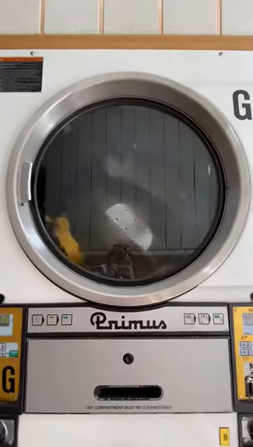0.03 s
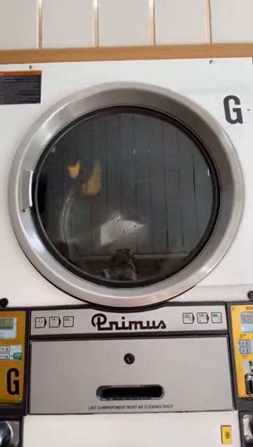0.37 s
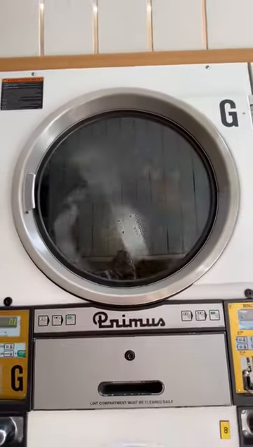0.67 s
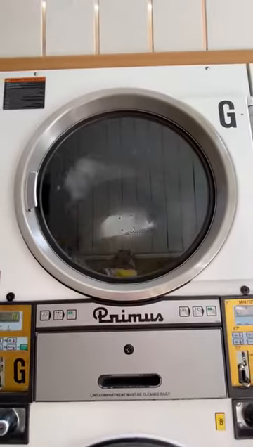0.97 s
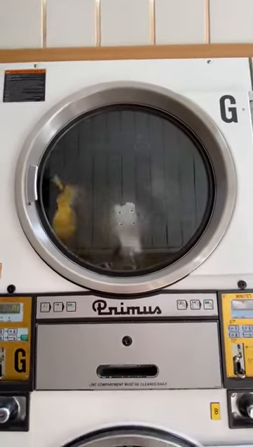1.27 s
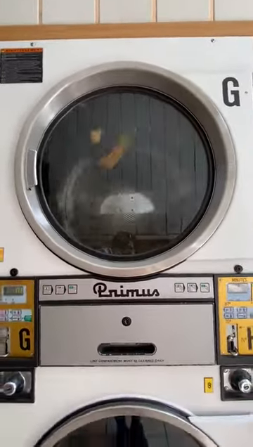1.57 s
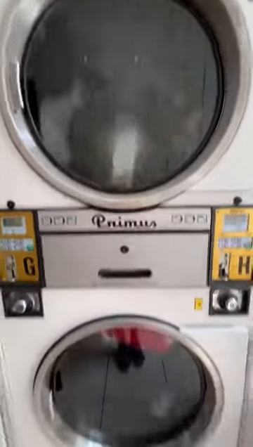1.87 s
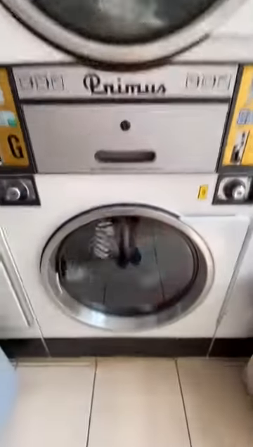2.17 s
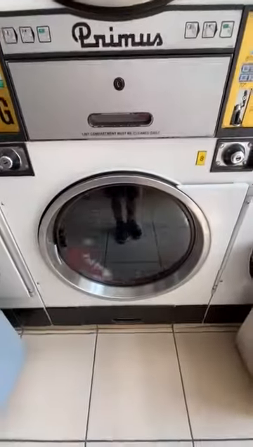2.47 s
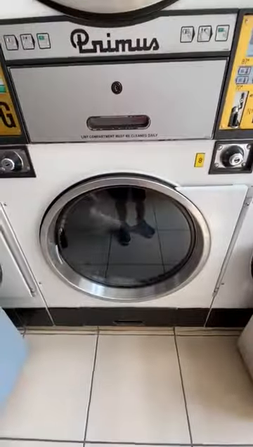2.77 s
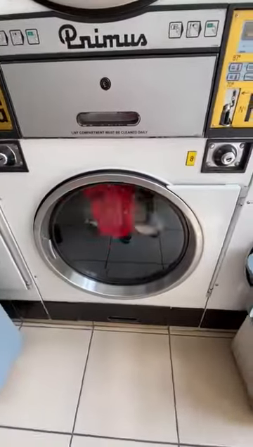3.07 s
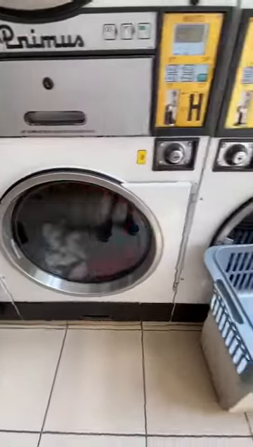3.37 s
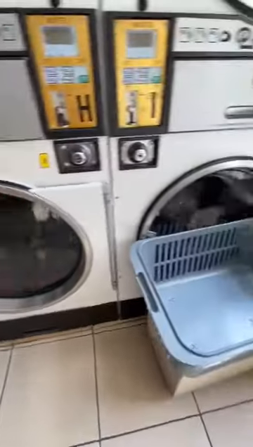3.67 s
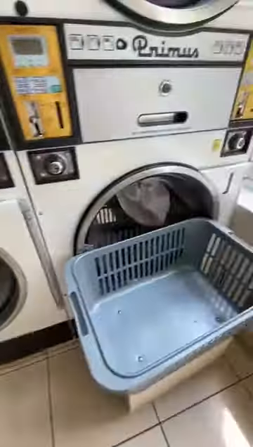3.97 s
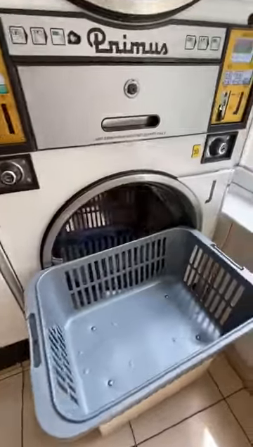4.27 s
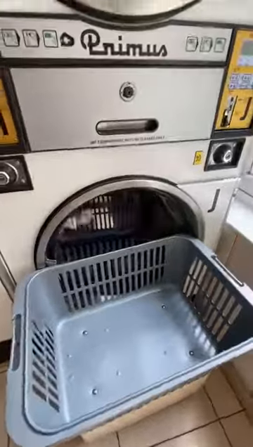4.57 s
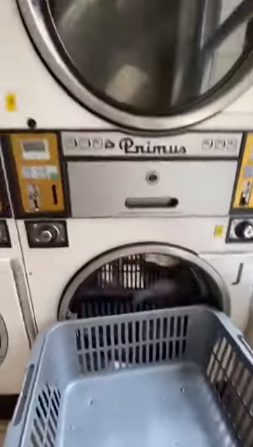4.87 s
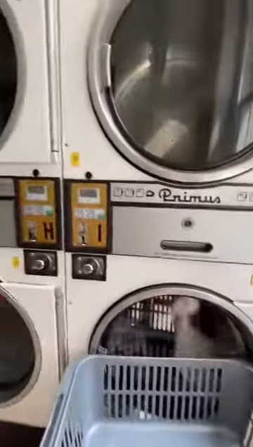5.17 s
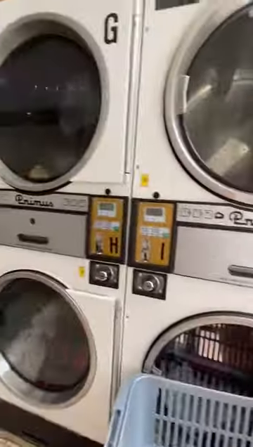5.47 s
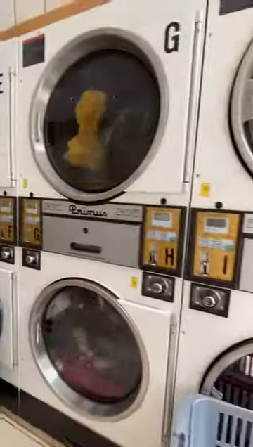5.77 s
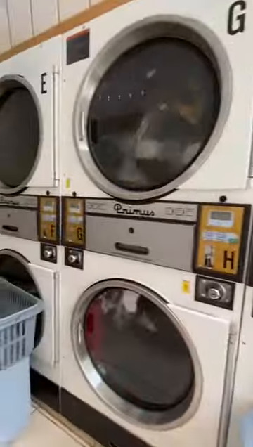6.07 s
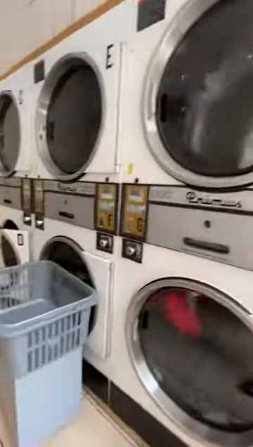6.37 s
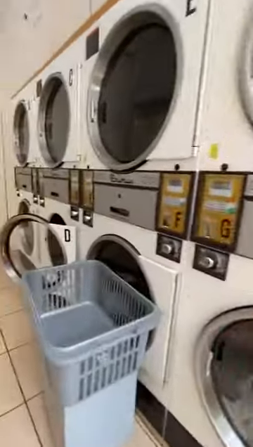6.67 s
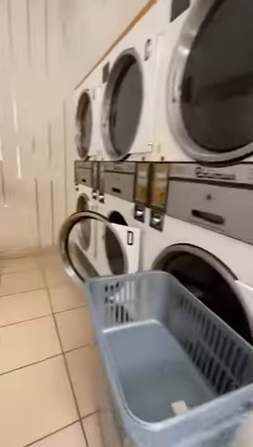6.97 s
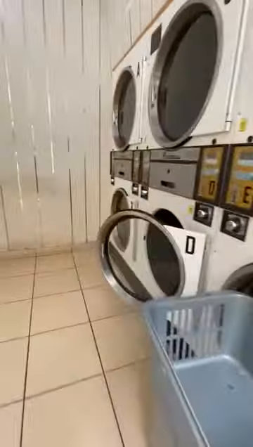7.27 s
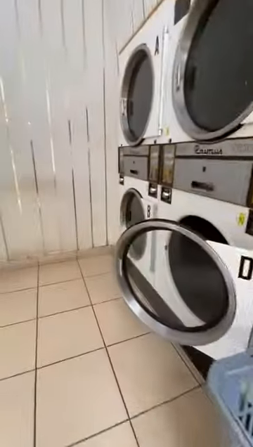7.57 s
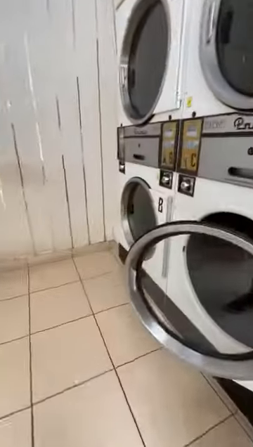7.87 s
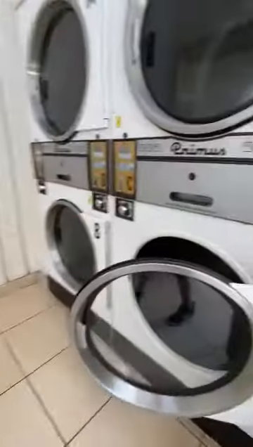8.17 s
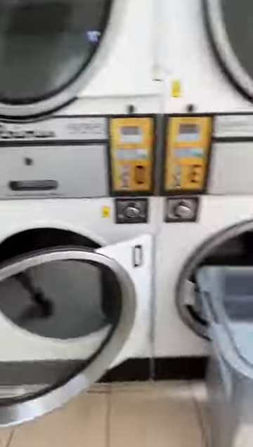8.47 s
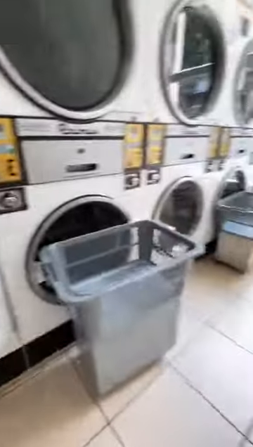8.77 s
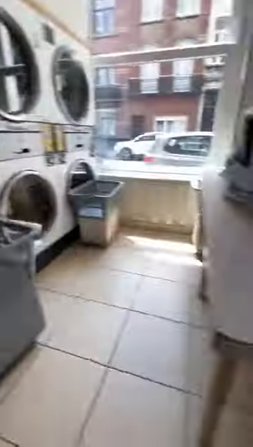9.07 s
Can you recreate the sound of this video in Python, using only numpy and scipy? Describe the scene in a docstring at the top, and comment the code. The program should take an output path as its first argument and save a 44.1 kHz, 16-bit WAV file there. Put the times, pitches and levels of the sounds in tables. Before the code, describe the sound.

Several tumble dryers run in a tiled laundrette, making a deep, throbbing hum over drum rumble and rushing air. A little more than once a second a zip clacks on a steel drum and damp washing knocks softly after it. Buttons tick and cloth swishes in between, with a faint whistle. The hum shifts as the microphone is carried along the machines, and the clicks thin out near the end.

```python
"""Laundrette tumble dryers

A phone is carried along a row of dryers in a tiled room, then away. Mains hum throbs against a slipping
motor, blowers push air through ducts and a whistling grille, drums rumble, a loose part buzzes faintly.
Once a drum turn a zip clacks on the steel and the wet bundle knocks after it; in between, buttons tick,
seams scrape and cloth rustles."""
import sys
import numpy as np
from scipy import signal
from scipy.fft import rfft, irfft, next_fast_len
from scipy.io import wavfile

SR = 44100
rng = np.random.default_rng(int(sys.argv[2]) if len(sys.argv) > 2 else 0)


def wav_record(signal):
    """Record a signal, one row per channel, as 16-bit PCM in the file named by sys.argv[1]."""
    frames = np.transpose(np.atleast_2d(signal))
    bounded = np.clip(frames, -1, 1)
    # unit amplitude maps onto the largest positive 16-bit level
    quanta = np.round(bounded * 32767).astype(np.int16)
    wavfile.write(sys.argv[1], SR, quanta)


N = 402191
TIME = np.arange(N) / SR
SIZE = next_fast_len(N, True)
FREQS = np.maximum(np.fft.rfftfreq(SIZE, 1 / SR), 1)


def undb(db):
    """Decibels to gain."""
    return 10 ** (np.asarray(db) / 20)


def unit(x):
    """Scale to rms 1."""
    return x / np.sqrt(np.mean(x ** 2))


def curves(table):
    """The columns of a time table as automation curves, one value a sample."""
    s, *columns = np.transpose(table)
    return [np.interp(TIME, s, c) for c in columns]


def across(points):
    """A (frequency, value) table spread over all frequencies."""
    hz, value = np.transpose(points)
    return np.interp(np.log(FREQS), np.log(np.sort(hz)), value)


def colour(x, eq):
    """Apply an EQ curve, scaled so that white noise keeps its power."""
    return irfft(rfft(x, SIZE) * unit(undb(across(eq))), SIZE)[..., :N]


def noise():
    """Two white noises: what both microphone ports share, and what reaches them diffusely."""
    return rng.standard_normal((2, N))


def drift(rate_hz):
    """Smooth random modulation with rms 1."""
    coarse = rng.standard_normal(8192)
    hz = np.arange(len(coarse) // 2 + 1) / TIME[-1]
    smooth = irfft(rfft(coarse) / (1 + (hz / rate_hz) ** 4))
    return unit(np.interp(TIME, np.linspace(0, TIME[-1], len(coarse)), smooth))


def swell(middle_s, half_s, steepness=2):
    """A bell-shaped fade in and out."""
    return np.exp(-((TIME - middle_s) / half_s) ** steepness)


def flutter(phase, rate_hz):
    """A carrier that wanders in level and phase: a narrow band of noise."""
    return drift(rate_hz) * np.sin(phase) + drift(rate_hz) * np.cos(phase)


def tone(hz, unsteady, flutter_hz):
    """A sine of which the unsteady share flutters."""
    phase = 2 * np.pi * (hz * TIME + rng.random())
    return unit((1 - unsteady) * np.sin(phase) + unsteady * flutter(phase, flutter_hz) / 2)


def grains(triggers, decay_s):
    """Each trigger fires a decaying grain of noise."""
    power = signal.lfilter([1], [1, -np.exp(-1 / (decay_s * SR))], triggers + 1e-18)
    return unit(noise() * np.sqrt(power))


# EQ of the room tone: (frequency [Hz], relative level [dB])
ROOM_EQ = [(4000, -8), (7400, -4), (8400, -2), (9300, 3), (11500, 0)]


def room_tone(level_db=-66):
    """The thin, even hiss of the room."""
    return colour(noise(), ROOM_EQ) * undb(level_db)


# faders along the walk: (time [s], drum rumble [dB], roar bass [dB], roar treble [dB], air hiss [dB])
BED_FADERS = [(0.1, -44.5, -33.5, -48.5, -52), (0.17, -36.5, -35.5, -49, -55),
              (3.72, -35, -32, -49.5, -51.5), (3.82, -38, -33, -50, -50.5), (4.5, -31.5, -34, -50, -51),
              (6.53, -38, -34, -49, -52), (7.05, -32.5, -36.5, -49.5, -54), (7.42, -37.5, -34.5, -53, -54),
              (7.69, -34.5, -37, -54.5, -55.5), (8.83, -38.5, -37, -54.5, -55.5),
              (8.95, -47.5, -37, -53, -53.5)]
# EQs of drum rumble, duct roar and air hissing through the drum holes: (frequency [Hz], rel. level [dB])
RUMBLE_EQ = [(15, -23), (28, -13), (42, -5.5), (55, -4.5), (65, -0.5), (85, -4.5), (120, -13), (180, -31.5),
             (400, -66.5)]
ROAR_EQ = [(60, -17.5), (130, 1), (190, 1), (245, -1.5), (290, 0.5), (320, -1.5), (410, -3.5), (460, -11),
           (560, -11.5), (630, -11.5), (720, -14.5), (1000, -18.5), (1300, -30.5), (3000, -48.5)]
HISS_EQ = [(500, -12.5), (1200, 3), (1550, 3), (1850, -0.5), (2500, 3.5), (3100, 3.5), (3800, -3.5),
           (4500, -5.5), (5600, -3), (6600, -1.5), (7600, -27), (8600, -13.5), (12000, -25.5)]


def dryer_bed(crossover_hz=580, surge_db=1.24, flicker_db=1.7):
    """Drums rumble, blowers roar and hiss; the machines' fronts shade the roar's treble sooner."""
    rumble_db, bass_db, treble_db, hiss_db = curves(BED_FADERS)
    out = colour(noise(), RUMBLE_EQ) * undb(rumble_db + 1)
    roar = colour(noise(), ROAR_EQ)
    bass = irfft(rfft(roar, SIZE) / (1 + (FREQS / crossover_hz) ** 6), SIZE)[:, :N]
    out += bass * undb(bass_db + 1 + surge_db * drift(8.5))
    out += (roar - bass) * undb(treble_db + 18 + surge_db * drift(7.4))
    return out + colour(noise(), HISS_EQ) * undb(hiss_db + 3 + flicker_db * drift(19))


# hum along the walk through the room's standing waves: (time [s], hum [dB], motor relative to hum [dB])
HUM_FADERS = [(0.0, -20.0, -13), (2.7, -23, -15), (3.0, -23.5, 0), (3.3, -22.5, -17), (3.7, -19, -15.5),
              (4.0, -24, -6), (4.3, -19, -6), (4.9, -19.5, -25), (5.2, -19.5, -10), (5.5, -23.5, -1),
              (5.9, -19, -13.5), (6.8, -28, -3), (7.1, -25, -19.5), (7.6, -28, -4.5), (7.9, -34.5, -11.9),
              (8.15, -47, -6), (8.3, -37, -12), (8.8, -29, -27), (9.12, -30, -9.5)]


def hum(hum_hz=100, slip_hz=1.615, in_step_s=0.338, unsteady=0.079):
    """The mains hum and a motor slipping just under it drift in and out of step, so the sum throbs."""
    hum_db, motor_db = curves(HUM_FADERS)
    phase = 2 * np.pi * hum_hz * TIME
    slip = 2 * np.pi * slip_hz * (TIME - in_step_s)
    motor = undb(motor_db) * np.sin(phase - slip)
    return np.sqrt(2) * undb(hum_db) * (np.sin(phase) + motor + unsteady * flutter(phase, 10))


# faders of the blower's shaft and of its strongest blade tone: (time [s], level [dB])
SHAFT_FADER = [(0.05, -45), (.35, -33), (.6, -46), (2.3, -38), (3.5, -39), (4.7, -35.5), (5.15, -31),
               (5.75, -37), (6.8, -43.5), (7.95, -32), (8.2, -33.5), (9.05, -32)]
BLADE_FADER = [(0, -35), (.08, -38.5), (.2, -43), (.32, -29.5), (.45, -44), (.6, -44.5), (.72, -33),
               (.87, -45), (1.1, -43.5), (1.25, -39), (1.8, -42), (2.0, -35.5), (2.17, -46), (2.44, -33.5),
               (2.75, -37.5), (2.9, -36), (3.07, -41), (3.22, -30.5), (3.45, -36), (3.55, -36),
               (3.73, -38.5), (3.92, -36), (4.09, -39.5), (4.24, -32.5), (4.4, -46), (4.6, -38),
               (4.69, -43), (4.74, -30.5), (4.8, -34.5), (4.9, -51.5), (6.1, -43.5), (6.45, -36.5),
               (6.65, -41), (6.9, -33.5), (7.35, -43.5), (7.8, -43.5), (8.3, -47), (8.6, -38.5),
               (8.85, -42.5), (9.12, -34.5)]
# low tones that swell and fade, mostly the hum's overtone near 200 Hz:
# (middle [s], half length [s], pitch [Hz], level [dB])
LOW_SWELLS = [(1.68, 0.2, 200, -35), (2.79, 0.12, 200, -34.5), (4.9, 0.14, 280.6, -36),
              (6.56, 0.11, 290.4, -37.5), (6.997, 0.3, 147, -34.5), (7.07, .12, 200, -33.5),
              (8.9, .14, 198, -36.5)]
# weaker motor and fan tones: (pitch [Hz], level [dB], unsteady share [0-1], flutter rate [Hz])
FAN_TONES = [(68.4, -43, 0.83, 2.5), (149.8, -48.5, 0.4, 4.7), (199, -44, 0.26, 4.9),
             (294.2, -47.5, 0.43, 3), (345, -46.5, 0.73, 5.2), (399, -47.5, 0.58, 5.5),
             (500.5, -57.5, 0.8, 9.1), (595, -52.5, 0.32, 3.3), (622.5, -54, 0.8, 4.5)]


def machine_tones():
    """An unbalanced shaft thrums, blade tones flutter in the uneven air flow, low tones swell and fade."""
    out = undb(curves(SHAFT_FADER)[0] - 0.5) * tone(hz=49.5, unsteady=0.23, flutter_hz=1.6)
    out += undb(curves(BLADE_FADER)[0] - 1.5) * tone(hz=395.2, unsteady=0.15, flutter_hz=5)
    for s, half, hz, db in LOW_SWELLS:
        out += undb(db) * swell(s, half) * tone(hz, unsteady=0.21, flutter_hz=2.9)
    for hz, db, unsteady, flutter_hz in FAN_TONES:
        out += undb(db) * tone(hz, unsteady, flutter_hz)
    return out


# the grille's whistle along the walk: (time [s], pitch [Hz], level [dB])
GRILLE_WHISTLE = [(0, 1069, -51.5), (2.05, 1077, -51.5), (3.47, 1093, -48.5), (4.5, 1092, -50.5),
                  (5.0, 1080, -53), (5.6, 1045, -52.5), (6.45, 1075, -47), (7.3, 1062, -60),
                  (9.12, 1056, -57.5)]


def whistle(core_half_width_hz=25, breath_half_width_hz=74):
    """Gusts of air through a grille blow a thin, drifting resonance with a breathy skirt."""
    hz, db = curves(GRILLE_WHISTLE)
    phase = 2 * np.pi * np.cumsum(hz) / SR
    gusts_db = 1.5 * drift(7)
    core = np.array([flutter(phase, core_half_width_hz) for _ in range(2)])
    breath = np.array([flutter(phase, breath_half_width_hz) for _ in range(2)])
    return undb(db - 2.5 + gusts_db) * core + undb(db - 5.5) * breath


# short whistle notes: (middle [s], half length [s], middle pitch [Hz], level [dB])
WHISTLE_NOTES = [(.87, .03, 1083, -46), (2.125, .03, 1056, -45), (2.602, 0.044, 1067, -42.5),
                 (2.919, .025, 1072, -49), (3.108, 0.023, 1070, -41), (3.461, 0.038, 1097, -41.5),
                 (4.173, .03, 1094, -51), (4.444, .03, 1102, -53), (6.46, 0.032, 1062, -45)]


def chirps(rise_hz_per_s=300, roughness=0.6):
    """Now and then the whistle catches in a short, slightly rough, rising note."""
    out = np.zeros(N)
    wobble, shake = roughness * drift(50), roughness * drift(50) / 2
    for s, half, hz, db in WHISTLE_NOTES:
        age = TIME - s
        phase = 2 * np.pi * (hz + rise_hz_per_s * age / 2) * age
        out += np.sqrt(2) * undb(db) * swell(s, half) * np.sin(phase + wobble)
    return out * (1 + shake)


# spells of buzzing: (middle [s], half length [s], level [dB])
BUZZ_SPELLS = [(.65, 0.95, -64.5), (1.956, 0.94, -67), (6.95, 0.34, -65.5)]


def buzz(mains_hz=50, decay_s=0.0015, scatter_db=1.0):
    """In spells, a loose part taps once each mains cycle."""
    age = TIME % (1 / mains_hz)
    taps = unit(noise() * np.exp(-age / decay_s) * undb(-scatter_db * drift(30)))
    spells = sum(undb(db) * swell(s, half, steepness=4) for s, half, db in BUZZ_SPELLS)
    return spells * colour(taps, [(3000, -21), (6000, 11.5), (8300, -10), (10000, 9), (12500, -10)])


# EQ of sliding cloth: (frequency [Hz], relative level [dB])
CLOTH_EQ = [(600, -8), (1400, 3.5), (2200, 3.5), (3600, -15), (4700, -2), (6000, 1), (7500, -12),
            (11500, -13)]


def rustle(touches_per_s=50, spread_db=3.5):
    """Seams and folds brush the drum at random, riding 10 dB under the air hiss fader."""
    touching = rng.random(N) < touches_per_s / SR
    strength = undb(spread_db * np.minimum(rng.exponential(size=N), 3))
    brushes = grains(touching * strength ** 2, decay_s=0.0067)
    hiss_db = curves(BED_FADERS)[-1]
    return colour(brushes, CLOTH_EQ) * undb(hiss_db - 10)


# scrapes of seams and studs: (middle [s], half length [s], band centre [Hz], level [dB])
SEAM_SCRAPES = [(0.103, .011, 5600, -46.5), (.17, .02, 5470, -53), (0.273, .012, 5500, -55),
                (1.343, 0.013, 5500, -54), (1.397, 0.017, 5800, -49), (1.554, .012, 5650, -50),
                (1.935, 0.0055, 5500, -49.5), (3.868, 0.038, 5170, -53.5), (4.149, 0.011, 5430, -54.5),
                (5.075, .014, 5260, -51.5), (5.117, .015, 5270, -54.5), (5.198, 0.04, 5500, -58),
                (6.634, .008, 5500, -56)]


def scrapes(catches_per_s=440, width_octaves=0.5):
    """Seams and studs drag over the drum holes, catching and slipping in short, bright scrapes."""
    catches = (rng.random(N) < catches_per_s / SR) * rng.exponential(size=N)
    grit = grains(catches, decay_s=0.0012)
    out = np.zeros((2, N))
    for s, half, hz, db in SEAM_SCRAPES:
        edges_hz = hz * 2 ** (np.array([-0.5, 0.5]) * width_octaves)
        band = signal.butter(4, edges_hz, "band", fs=SR, output="sos")
        near = np.abs(TIME - s) < 0.5
        out[:, near] += undb(db) * swell(s, half)[near] * unit(signal.sosfilt(band, grit[:, near]))
    return out


# hits on the drum wall; the last three columns are relative to the hit's level:
# (time [s], level [dB], steel ring [dB], sharp contact [dB], swish [dB])
ZIP_HITS = [(.927, -32, -9.5, -5.5, -26.5), (2.167, -32, -8.5, -12, -27), (3.410, -33, -8.5, -7.5, -27),
            (4.6531, -34, -8.5, 2.5, -29), (5.892, -34.5, -8, -1, -26), (8.386, -41.5, -14, -8, -27)]  # the zip drops from the top of the drum
BUNDLE_HITS = [(1.170, -39.5, -2.5, 0.5, -14), (2.411, -41, 2.5, -2, -8.5), (3.654, -41, -1.5, 1, -9.5),
               (4.891, -43, 3, 2, -8), (6.130, -42.5, 2, 4, -8), (7.374, -43, -8, -3, -8),
               (8.616, -43.5, -6.5, 2, -11.5)]  # the wet bundle lands a quarter of a second later
BUTTON_HITS = [(.101, -42, -3.5, 1, -11.5), (.381, -45, -7, 2, -20), (.417, -44.5, -10, -3, -16.5),
               (1.337, -44, -7, 4, -12), (1.614, -43, -4, -2, -10.5), (1.765, -45, -7, -2, -8.5),
               (2.727, -42, -14, 3, -13.5), (2.771, -45, -6, 0, -11), (3.337, -43.5, -11, 2, -18),
               (3.616, -45, -15, 2, -16.5), (3.829, -44.5, -5, 3, -13), (4.006, -49, -5, 0, -13),
               (4.144, -45.5, -7.5, 0, -8.5), (5.068, -47.5, 4.5, -5, -1.5), (5.307, -44, -6.5, -2, -14.5),
               (5.385, -44, -3.5, 1, -13)]  # loose buttons and studs tick in between
CUSHIONED_HITS = [*BUNDLE_HITS, *BUTTON_HITS]
ALL_HITS = [*ZIP_HITS, *CUSHIONED_HITS]
# longer slides of the washing: (middle [s], half length [s], level [dB])
CLOTH_SLIDES = [(.40, 0.18, -50.5), (1.46, 0.14, -49.5), (3.93, 0.11, -55), (6.45, 0.09, -50),
                (7.7, 0.13, -55.5)]


def swishes(half_s=0.045, grain_db=2.5):
    """Cloth slides along the drum in a grainy swish with each hit and in a few longer strokes."""
    falls = [(s, half_s, db + swish_db) for s, db, _, _, swish_db in ALL_HITS]
    envelope = sum(undb(db) * swell(s, half) for s, half, db in [*falls, *CLOTH_SLIDES])
    return colour(noise() * unit(undb(grain_db * drift(150))), CLOTH_EQ) * envelope


def each_hit(hits):
    """Yield each hit's row, the samples around it, their age [s] and the fall [dB] for a t60 of 1 s."""
    for row in hits:
        near = np.flatnonzero(np.abs(TIME - row[0]) < 0.5)
        age = TIME[near] - row[0]
        yield row, near, age, -60 * np.abs(age)


# EQs of the echo off drum and tiles and of the sheet steel's dense ring, for zip and button ticks
# and for the bundle's knock: (frequency [Hz], relative level [dB])
TICK_ECHO_EQ = [(1000, -26), (2500, -2), (4000, -5), (6000, 6.5), (8500, 1.5), (10000, 3.5), (12000, -7.5)]
TICK_RING_EQ = [(500, -19.5), (1000, -1.5), (1500, -9), (2400, 9.5), (3100, 1), (4000, -0.5), (6000, -13),
                (9000, -22)]
KNOCK_ECHO_EQ = [(1000, -20), (2400, -2), (3500, -8), (5600, 1.5), (6600, -3.5), (7800, -8), (9300, 4),
                 (11000, 3), (12000, -3.5)]
KNOCK_RING_EQ = [(500, -13), (1000, -2.5), (1400, 3.5), (1750, -4), (2150, 6.5), (3200, -5.5), (5600, -10),
                 (9000, -21)]


def hit_tails(hits, echo_eq, ring_eq, ring_db, echo_db=-8.5, echo_t60=0.29, ring_t60=0.31):
    """A brief scrape leads into each hit; afterwards the drum's sheet steel and the tiles ring on."""
    echo_power, ring_power = np.zeros((2, N))
    for (_, db, steel_db, _, _), near, age, fall_db in each_hit(hits):
        lead_in = undb(-16.5) * np.exp(-np.abs(age) / 0.006)
        tail = undb(echo_db + fall_db / echo_t60)
        echo_power[near] += (undb(db) * np.where(age > 0, tail, lead_in)) ** 2
        ring_power[near] += (age > 0) * undb(db + steel_db + ring_db + fall_db / ring_t60) ** 2
    echo = colour(noise() * np.sqrt(echo_power), echo_eq)
    return echo + colour(noise() * np.sqrt(ring_power), ring_eq)


def rattle(hits, trim_db, t60, hardening=0.78):
    """A short noise burst at each contact; fast hits bite harder, slow ones are cushioned by cloth."""
    envelope = np.zeros(N)
    hardest_db = max(row[1] for row in ALL_HITS)
    for (_, db, _, sharp_db, _), near, age, fall_db in each_hit(hits):
        contact_db = db + sharp_db + hardening * (db - hardest_db)
        envelope[near] += (age > 0) * undb(contact_db + trim_db + fall_db / t60)
    return envelope * rng.standard_normal(N)


# EQ of the bare zip's hard contact: (frequency [Hz], relative level [dB])
ZIP_CLICK_EQ = [(1000, -4), (2500, -.5), (4000, -1), (6000, -3), (8000, -4.5), (10500, 2.5), (12500, 3)]
# EQ of a thin, very high tick, mostly 9-11 kHz: (frequency [Hz], relative level [dB])
THIN_TICK_EQ = [(1500, -13), (3500, -15), (5600, -5), (6700, -10), (7800, -24), (9300, 6.5), (11000, 6.5),
                (12000, -4)]


def snaps(pulse_db=17, bounce_s=0.004, bounce_db=-5):
    """The attacks: the bare zip gives a sharp pulse and a bounce, bundle and buttons a thin, high tick."""
    zip_clicks = rattle(ZIP_HITS, trim_db=4, t60=0.026)
    for s, db, _, sharp_db, _ in ZIP_HITS:
        pulse = undb(db + sharp_db + pulse_db)
        delay_s = bounce_s * (0.5 + rng.random())
        zip_clicks[int(s * SR)] += pulse
        zip_clicks[int((s + delay_s) * SR)] += pulse * undb(bounce_db)
    thin_ticks = rattle(CUSHIONED_HITS, trim_db=2, t60=0.035)
    return colour(zip_clicks, ZIP_CLICK_EQ) + colour(thin_ticks, THIN_TICK_EQ)


# modes of the drum wall and of the zip's metal pull: (frequency [Hz], relative level [dB], t60 [s])
WALL_MODES = [(1440, -19.5, 0.1), (1750, -22, .11), (2150, -25, .1), (2430, -21, .07), (3770, -22, 0.059),
              (4970, -20.5, .05), (5400, -25, 0.042), (5950, -19.5, .05)]
PULL_MODES = [(4100, -17, .03), (6500, -16, .03), (9750, -13, .035), (10800, -13, .03), (11350, -11, .035)]


def clacks(hits, modes, trim_db, cushion_db_per_octave=0.0, scatter_db=2, detune=0.025):
    """Each hit rings the metal's modes in a mix set by where it lands; cloth softens the higher ones."""
    hz, mode_db, t60 = np.transpose(modes)[:, :, None]
    mode_db = mode_db - cushion_db_per_octave * np.log2(hz / hz.min())
    out = np.zeros(N)
    for (_, db, *_), near, age, fall_db in each_hit(hits):
        place, shift = rng.standard_normal((2, len(modes), 1))
        envelopes = undb(mode_db + scatter_db * place + fall_db / t60)
        rings = envelopes * np.sin(2 * np.pi * hz * (1 + detune * shift) * age)
        out[near] += (age > 0) * undb(db + trim_db) * rings.sum(0)
    return out


# how alike the two microphone ports sound: (frequency [Hz], likeness [clipped to 0-1])
PORT_LIKENESS = [(100, 4), (300, 0.5), (410, 3), (520, 0.23), (750, 0.45), (1700, 0.83), (2250, 0.4),
                 (3000, 0.76), (3900, 0.68), (5500, 0.8), (6400, 0), (7800, 2.5), (9100, 1), (10000, 26)]
# phase between the ports: (frequency [Hz], lead of the left [rad])
PORT_LEAD = [(100, 0.2152), (400, 0.47), (680, -1.7), (1000, -0.85), (1800, 0.1), (2550, -3), (3500, -2.5),
             (4200, -1.4), (5600, -0.2), (7000, -4.5), (8700, -2.5), (9300, -6), (12000, -7)]
# balance between the ports: (frequency [Hz], left minus right [dB])
PORT_BALANCE = [(45, 1), (100, -2.5), (200, -5), (300, -5), (400, -9.5), (550, -7.5), (750, -3),
                (1050, 0.5), (12000, -.5)]


def stereo_image(shared, diffuse):
    """Two ports hear the room partly alike, with phase and level differences set by the phone's body."""
    alike = np.clip(across(PORT_LIKENESS), 0, 1)
    sides = np.array([[1], [-1]])
    mid = rfft(shared, SIZE) * np.sqrt((1 + alike) / 2)
    side = rfft(diffuse, SIZE) * np.sqrt((1 - alike) / 2)
    lead = np.exp(0.5j * sides * across(PORT_LEAD))
    balance = undb(sides * across(PORT_BALANCE) / 2)
    return irfft((mid + sides * side) * lead * balance, SIZE)[:, :N]


def scene():
    """The mix: beds, cloth and tails spread wide; snaps and clacks come from straight ahead."""
    tails = hit_tails([*ZIP_HITS, *BUTTON_HITS], TICK_ECHO_EQ, TICK_RING_EQ, ring_db=-1.5)
    tails += hit_tails(BUNDLE_HITS, KNOCK_ECHO_EQ, KNOCK_RING_EQ, ring_db=-2.5)
    background = dryer_bed() + room_tone() + whistle() + buzz()
    shared, diffuse = background + swishes() + scrapes() + rustle() + tails
    shared += hum() + machine_tones() + chirps()
    metal = clacks(ZIP_HITS, WALL_MODES, trim_db=4.5)
    metal += clacks(ZIP_HITS, PULL_MODES, trim_db=-6.5, detune=0.0084)
    metal += clacks(CUSHIONED_HITS, WALL_MODES, trim_db=-4.5, cushion_db_per_octave=2.5)
    fade = np.clip(np.minimum(TIME, TIME[-1] - TIME) / 0.005, 0, 1)
    return stereo_image(fade * shared, fade * diffuse) + snaps() + metal


def record(dry):
    """The phone cuts the top steeply above 11750 Hz."""
    return signal.sosfilt(signal.ellip(10, 0.2, 80, 11750, fs=SR, output="sos"), dry)


dry = scene()
out = record(dry)
wav_record(out)
```